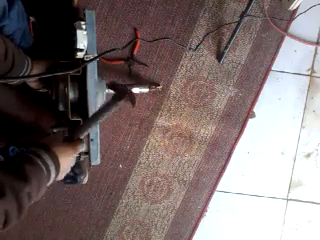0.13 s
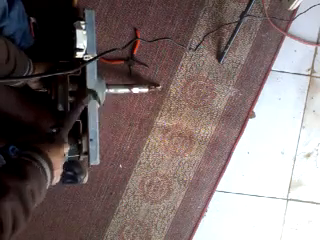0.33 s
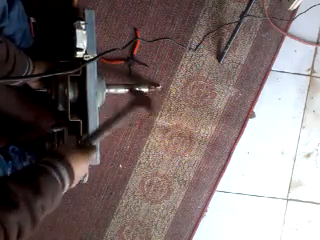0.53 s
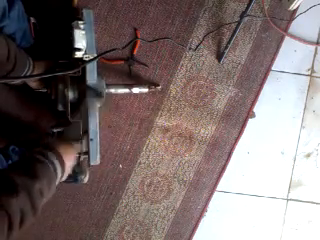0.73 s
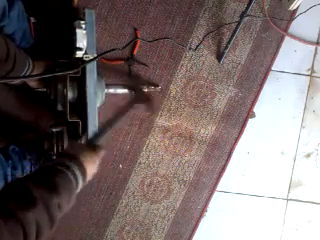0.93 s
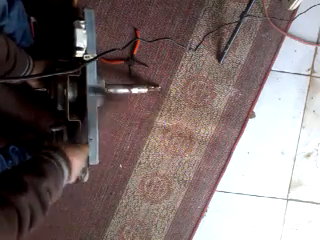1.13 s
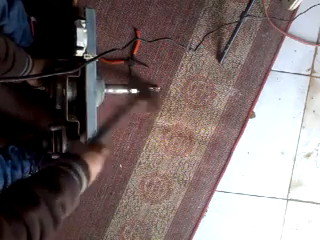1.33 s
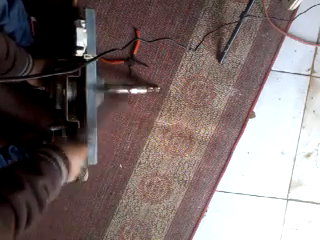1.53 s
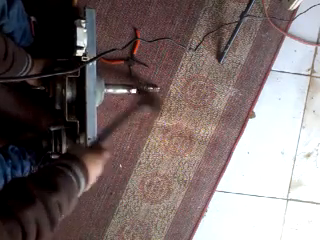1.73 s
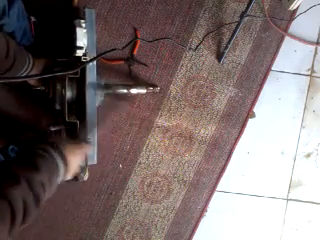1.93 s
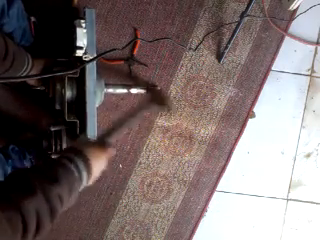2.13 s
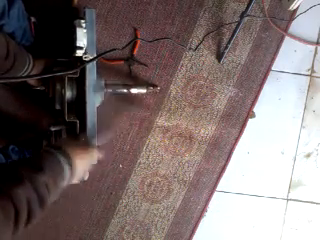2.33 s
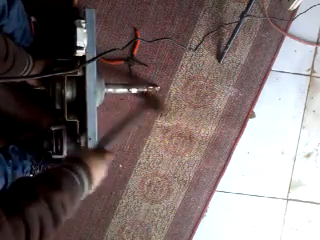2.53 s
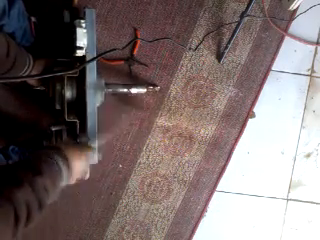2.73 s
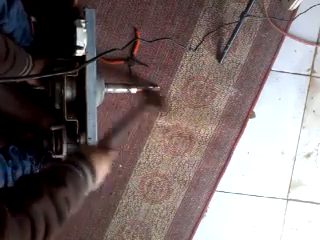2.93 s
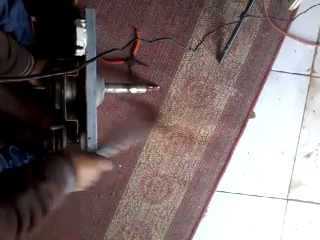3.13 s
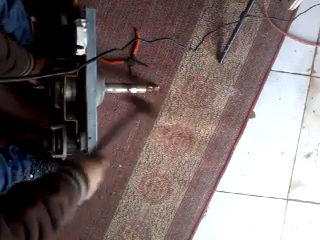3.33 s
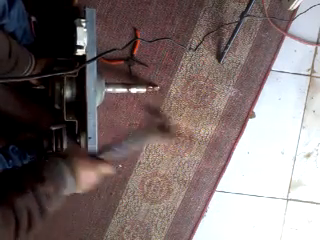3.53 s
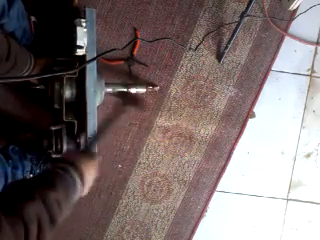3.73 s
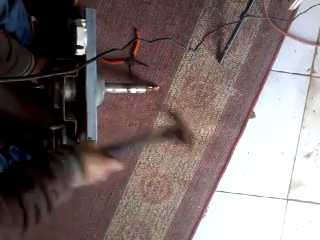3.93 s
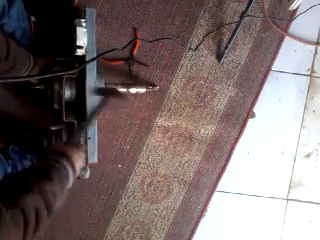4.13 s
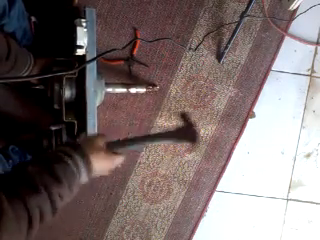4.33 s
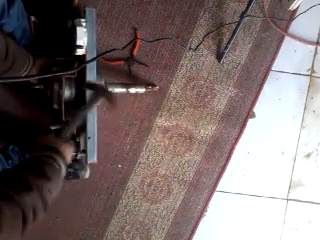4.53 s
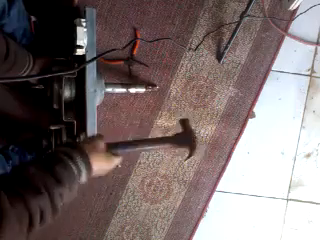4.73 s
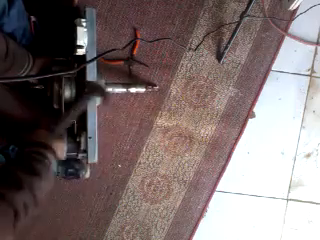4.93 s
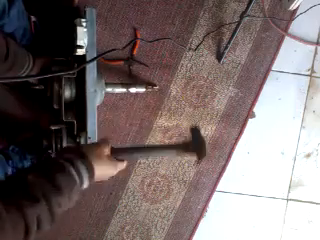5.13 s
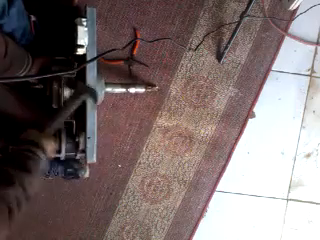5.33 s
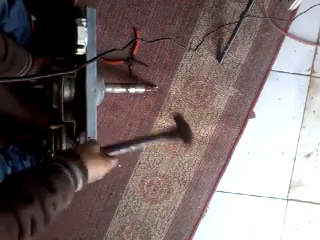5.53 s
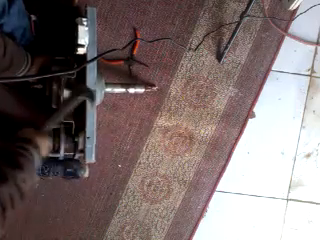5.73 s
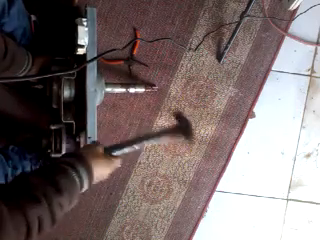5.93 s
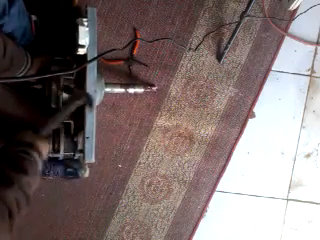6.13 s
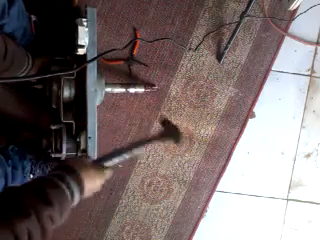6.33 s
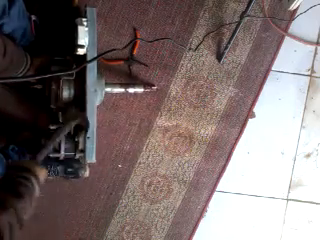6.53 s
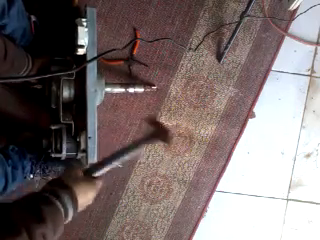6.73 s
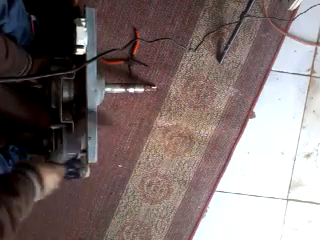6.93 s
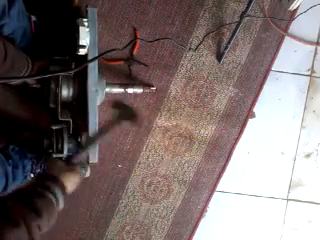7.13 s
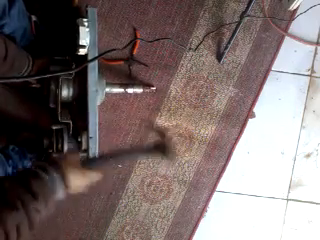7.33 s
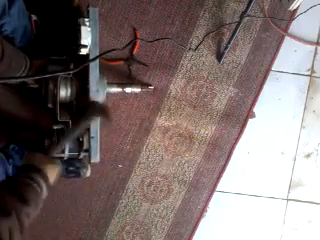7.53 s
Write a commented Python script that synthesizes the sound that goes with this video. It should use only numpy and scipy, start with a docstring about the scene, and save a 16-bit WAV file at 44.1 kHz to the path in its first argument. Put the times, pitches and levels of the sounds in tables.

```python
"""Hammering a shaft out of its bearing

A hard-walled workshop, microphone close: a steel hammer drives the shaft with steady blows after a few light touches.
Each blow is filtered noise for snap, crack and room, plus a tiny pitched click and a singing band of noise.
Solid blows add a clear low thud, a swelling and dying sine. Quiet air and a fading boom are shaped noise.
A limiter flattens the loudest peaks of the blows."""
import sys
import numpy as np
from scipy import signal
from scipy.fft import rfft, irfft
from scipy.io import wavfile
from scipy.ndimage import uniform_filter1d, minimum_filter1d

SR = 44100
rng = np.random.default_rng(int(sys.argv[2]) if len(sys.argv) > 2 else 0)


def to_wav(sig):
    """Store sig (one row per channel, or 1-D mono) as 16-bit WAV at the path in sys.argv[1].

    Samples outside -1..1 are clipped; the rate is SR.
    """
    pcm = np.clip(np.atleast_2d(sig), -1, 1) * 32767
    pcm = np.round(pcm).astype(np.int16)
    wavfile.write(sys.argv[1], SR, pcm.T)  # frames by channels


N = 332955
SIZE = 32768  # samples in one struck sound
AGE = np.arange(SIZE) / SR  # seconds since the strike
FREQS = np.maximum(np.fft.rfftfreq(SIZE, 1 / SR), 1)  # Hz, kept above zero for the logarithms
TOP_HZ = 14000  # upper limit of the recorded sound


def amp(db):
    """Decibels to gain."""
    return 10 ** (np.asarray(db) / 20)


def lookup(points, hz):
    """Read (Hz, value) points on a log-frequency axis."""
    at, value = np.transpose(points)
    return np.interp(np.log(hz), np.log(at), value)


def fade(t60):
    """Exponential decay that loses 60 dB in t60 seconds."""
    return np.exp(-np.log(1000) * AGE / t60)


def add(track, start_s, sound):
    """Mix a sound into the track at a time, cut off where the track ends."""
    start = int(start_s * SR)
    part = sound[:max(len(track) - start, 0)]
    track[start:start + len(part)] += part


def colour(x, gain):
    """Minimum-phase filter with the given gain at FREQS, so that attacks stay sharp."""
    cepstrum = irfft(np.log(gain))
    # folding the cepstrum onto positive times makes the filter causal
    cepstrum[1:SIZE // 2] *= 2
    cepstrum[SIZE // 2 + 1:] = 0
    response = np.exp(rfft(cepstrum))
    return irfft(rfft(x) * response)


def noise(points, size):
    """Noise of rms 1 with a (Hz, dB) spectrum."""
    hz = np.maximum(np.fft.rfftfreq(size, 1 / SR), 1)
    spectrum = rfft(rng.standard_normal(size)) * amp(lookup(points, hz))
    x = irfft(spectrum, size)
    return x / x.std()


def hump(hz, width_hz, db):
    """Gain of a steep-sided resonance standing on a flat spectrum."""
    return np.hypot(1, amp(db) / np.hypot(1, (2 * (FREQS - hz) / width_hz) ** 2))


# Spectrum of the still workshop air. Each row: frequency in Hz, relative level in dB.
AIR_SPECTRUM = [(30, -7), (120, -11.5), (300, -11.5), (800, -13), (2000, -23.5), (6000, -19.5),
                (13000, -23.5)]
# Spectrum of the low boom in the room. Each row: frequency in Hz, relative level in dB.
BOOM_SPECTRUM = [(40, -25), (90, -11), (140, -7.5), (330, -16), (700, -20), (1500, -28.5), (5000, -30),
                 (12000, -38.5)]


def background(air_db=-72, boom_db=-53, boom_t60=0.85):
    """Still workshop air as steady noise, and a low boom that dies away exponentially from the start."""
    out = amp(air_db) * noise(AIR_SPECTRUM, size=N)
    boom = noise(BOOM_SPECTRUM, size=SIZE) * fade(boom_t60)
    add(out, 0, amp(boom_db) * boom)
    return out


# Reverberation of the workshop. Each row: frequency in Hz, time to fall 60 dB in seconds.
ROOM_DECAY = [(60, 0.49), (130, 0.99), (280, 0.43), (500, 0.56), (850, 0.62), (2000, 0.58), (4000, 0.48),
              (5500, 0.53), (8000, 0.4), (13000, 0.33)]
# Colour of the sound off the hard walls. Each row: frequency in Hz, relative level in dB.
WALL_COLOUR = [(60, 6), (300, 0), (700, 2), (2000, 2), (5000, 0.5), (8000, 3.5), (13000, -1.5)]


def reflections(count, build_s=0.0086):
    """Diffuse room responses: noise that builds up quickly, then each frequency dies at its own rate."""
    spectra = rfft(rng.standard_normal((count, SIZE)))
    wall_gain = amp(lookup(WALL_COLOUR, FREQS))
    centres, t60s = np.transpose(ROOM_DECAY)
    out = 0
    # each row of the identity matrix makes one overlapping triangular band
    for share, t60 in zip(np.eye(len(centres)), t60s):
        band = np.interp(np.log(FREQS), np.log(centres), share) * wall_gain
        out = out + irfft(spectra * band) * fade(t60)
    return out * (1 - np.exp(-AGE / build_s))


# Crowded, quickly damped resonances of hammer, shaft and bearing.
# Each row: frequency in Hz, gain in dB.
CLANK_SPECTRUM = [(40, -37.5), (120, -13.5), (190, -9), (290, -1), (370, -5), (470, 3), (800, 3),
                  (1020, -4.5), (1400, -3.5), (2100, 1), (3300, 1.5), (5000, 4), (7000, 1), (10000, -6),
                  (13500, -10)]
# Sharper modes of frame and shaft.
# Each row: frequency in Hz, width in Hz, typical level in dB relative to the clank.
SHARP_MODES = [(409, 4.1, 5.5), (499, 79, -1.5), (610, 29, -2), (758, 11, 3.5), (827, 26, 7.5),
               (1132, 38.5, 4.5), (1224, 40, 5.5), (1621, 30, 3), (1982, 10, 5), (2070, 14, -4.5),
               (2350, 37, 0.5), (3170, 110, -3), (3363, 97, 1.5), (4160, 21, 7), (4104, 33, 0.5),
               (4000, 27, -2.5), (5320, 30, -1.5), (5140, 48, 1), (5480, 13, -2), (5873, 54, 2),
               (6575, 91, 1.5), (6810, 8, -9)]


def resonances(scatter_db=3):
    """Gain of the struck assembly; no two strikes share their force alike among the modes."""
    luck_db = scatter_db * rng.standard_normal(len(SHARP_MODES))
    peaks = 0  # power relative to the clank
    for (hz, width_hz, db), luck in zip(SHARP_MODES, luck_db):
        peaks = peaks + amp(db + luck) ** 2 / (1 + (2 * (FREQS - hz) / width_hz) ** 2)
    return amp(lookup(CLANK_SPECTRUM, FREQS)) * np.sqrt(1 + peaks)


# The hammer face touching the shaft while aiming. Each row: start in seconds, relative level in dB.
AIMING_TOUCHES = [(0.172, -44), (.180, -45), (.247, -46.5), (.255, -45), (.313, -45)]


def aiming(t60=0.029, room_db=-16, tick_db=-13):
    """Light touches of steel on steel before the first blow: short noise and its room, through the resonances."""
    out = np.zeros(N)
    gain = resonances() * hump(5400, width_hz=1000, db=6)  # one draw, shared by all touches
    for (start_s, db), room in zip(AIMING_TOUCHES, reflections(len(AIMING_TOUCHES))):
        tick = rng.standard_normal(SIZE) * fade(t60) + amp(room_db) * room
        add(out, start_s, amp(db + tick_db) * colour(tick, gain))
    return out


def thud(hz=198, swell_s=0.0016, db=-16.5):
    """The shaft gives way and the whole machine lurches for a cycle or two."""
    swell = AGE / swell_s * np.exp(1 - AGE / swell_s)
    return amp(db) * swell * np.sin(2 * np.pi * hz * AGE)


def steel(frame_db, bright_db, frame_hz=1200, bright_hz=7000):
    """Low and high tilt of one blow, and a fine random unevenness of the spectrum, drawn anew for each blow."""
    low_db = frame_db / (1 + (FREQS / frame_hz) ** 4)
    high_db = bright_db / (1 + (bright_hz / FREQS) ** 4)
    spots = np.linspace(0, SR / 2, 440)  # Hz, about 50 Hz apart
    unevenness = np.interp(FREQS, spots, rng.standard_normal(len(spots)))
    depth_db = np.minimum(2 + FREQS / 5000, 4)
    return amp(low_db + high_db + depth_db * unevenness)


def snap(db=-1, t60=0.01):
    """The bright instant of steel meeting steel: differenced noise, which favours the treble."""
    return amp(db) * np.diff(rng.standard_normal(SIZE + 1)) * fade(t60)


def crack(t60, db=-5, body_hz=850):
    """Dense direct ringing; the slim shaft radiates its low notes poorly, so those arrive by way of the room."""
    slim = signal.butter(1, body_hz, "high", fs=SR, output="sos")
    return amp(db) * signal.sosfilt(slim, rng.standard_normal(SIZE) * fade(t60))


def click(hz, db=-9, t60=0.0051):
    """A tiny pitched click at the onset, a sine that dies within a few milliseconds."""
    return amp(db) * fade(t60) * np.sin(2 * np.pi * hz * AGE)


def shimmer(hz, db=-13.5, width_hz=650, t60=0.36):
    """A cluster of close shaft modes, heard as a band of noise that sings on after the crack."""
    band = 1 / np.hypot(1, (2 * (FREQS - hz) / width_hz) ** 2)
    return amp(db) * colour(rng.standard_normal(SIZE) * fade(t60), band)


# Bending resonances of the shaft at a fully off-centre blow.
# Each row: frequency in Hz, width in Hz, level in dB relative to the flat spectrum.
BENDING_MODES = [(3284, 650, 11.5), (4220, 550, 6.5)]


def shaft(ring_hz, ring_db, off_centre, ring_width_hz=980, bend_power=4.75):
    """Gain of the shaft: its lengthwise ring, and bending that grows as the blow lands off centre."""
    bending = np.prod([hump(hz, width_hz, db) for hz, width_hz, db in BENDING_MODES], axis=0)
    return hump(ring_hz, ring_width_hz, ring_db) * bending ** (off_centre ** bend_power)


# The hammer blows, close to the microphone. Each row: start in seconds, force in dB, treble tilt in dB,
# distance off centre from 0 to 1, shaft ring in Hz, relative thud level in dB.
HAMMER_BLOWS = [ (0.439, -6, -3.5, 0.84, 4700, -41), (0.8764, -3.5, -0.5, 0.21, 5370, -38),
                (1.2835, -2.5, -1.5, 0, 5380, -25), (1.6880, -1.5, -1.5, 0.33, 5300, -17),
                (2.0892, -1, -2, 0.21, 5270, -33), (2.4930, -1.5, 1, 0, 5500, -29.5),
                (2.8926, -2.5, 2.5, 0, 5300, 1), (3.3057, -3.5, 5.5, 0.94, 5300, -11),
                (3.7177, -4, 4, 0.95, 5350, -18), (4.1292, -3, 0.5, 0.18, 5740, -12),
                (4.5598, -1.5, 1.5, 0.51, 5700, 0.5), (4.9692, 0, -8, 0.53, 5430, -23),
                (5.3974, -1, 0.5, 0.5, 5700, 1), (5.8092, -2.5, -5.5, 0.64, 5300, -20),
                (6.2170, -1.5, -5, 0.42, 5900, -26), (6.6142, 0.5, -3.5, .65, 4600, -24),
                (7.0782, 1.6, -1.5, 0.68, 5240, -13), (7.5252, 1.5, 5, 0.03, 5720, 1)]
# How much of each blow the frame takes: most while the shaft is midway through the bearing.
# Each row: time in seconds, low-frequency tilt in dB.
FRAME_SHARE = [(0.4, 0), (1.3, 0), (2.7, 2), (3.35, 6.5), (4.9, 3.5), (5.8, 5), (7.1, 1.5)]


def hammer(room_db=-16, thud_room_db=-43, square_ring_db=9, free_t60=0.074, choked_t60=0.051):
    """Every blow excites snap, crack and room through the steel, a click, the shaft's shimmer, and the thud."""
    out = np.zeros(N)
    walls, *moving = reflections(len(HAMMER_BLOWS) + 1)
    for blow, changed in zip(HAMMER_BLOWS, moving):
        start_s, force_db, bright_db, off_centre, ring_hz, thud_db = blow
        off_centre = np.clip(off_centre, 0, 1)
        solid = min(amp(thud_db), 1)
        # a square blow rings the shaft along its length; an off-centre one rings less and bends it instead
        ring_db = square_ring_db * (1 - off_centre)
        frame_db = np.interp(start_s, *np.transpose(FRAME_SHARE))
        # the crack is shorter when the shaft gives way with a thud or the blow glances
        choke = max(solid, off_centre ** 2)
        crack_t60 = free_t60 * (1 - choke) + choked_t60 * choke
        # the walls stay put, but arm and hammer change half of the echo paths
        room = (walls + changed) / np.sqrt(2)
        # the ring shifts as the shaft creeps through the bearing's grip
        gain = resonances() * shaft(ring_hz, ring_db, off_centre) * steel(frame_db, bright_db)
        clank = colour(snap() + crack(crack_t60) + amp(room_db) * room, gain)
        ringing = amp(ring_db) * (click(ring_hz) + shimmer(ring_hz))
        add(out, start_s, amp(force_db) * (clank + ringing))
        lurch = amp(thud_db) * thud()
        lurch_in_room = irfft(rfft(lurch) * rfft(room))
        add(out, start_s, lurch + amp(thud_room_db) * lurch_in_room)
    return out


def scene():
    """The hammering in the workshop, one channel."""
    return (hammer() + aiming() + background())[None]


def limiter(x, ceiling=0.95, size=25):
    """Turn the gain down around each loud peak, for about half a millisecond to either side."""
    gain = 1 / np.sqrt(np.hypot(1, (x / ceiling) ** 2))
    lowest = minimum_filter1d(gain, size)
    return x * uniform_filter1d(lowest, size)


def record(dry, bass_hz=50):
    """Cut the top, flatten the blows with the limiter, then cut the deep bass and the top again."""
    top = signal.ellip(8, .2, 70, TOP_HZ, fs=SR, output="sos")
    held = limiter(signal.sosfilt(top, dry))
    bass_cut = signal.butter(2, bass_hz, "high", fs=SR, output="sos")
    thin = signal.sosfilt(bass_cut, held)
    return signal.convolve(thin, signal.firwin(101, TOP_HZ, fs=SR)[None], "same")


dry = scene()
out = record(dry)
to_wav(out)
```